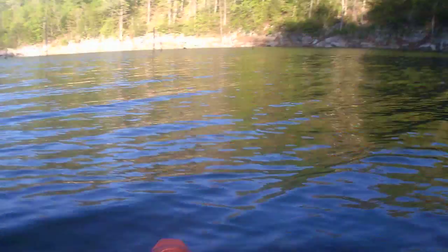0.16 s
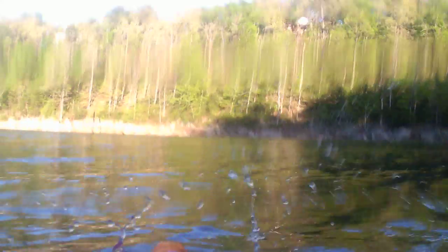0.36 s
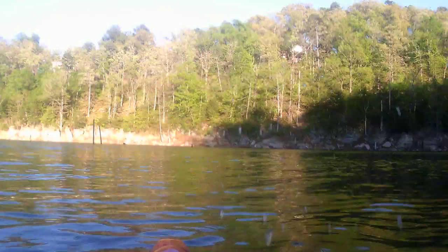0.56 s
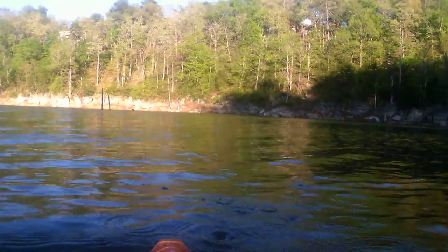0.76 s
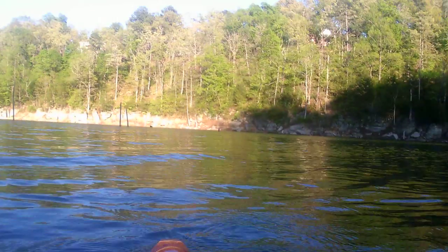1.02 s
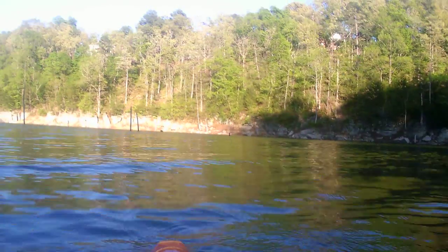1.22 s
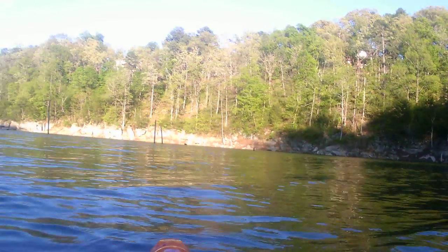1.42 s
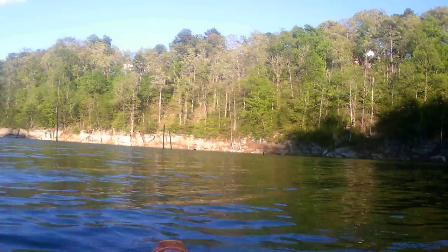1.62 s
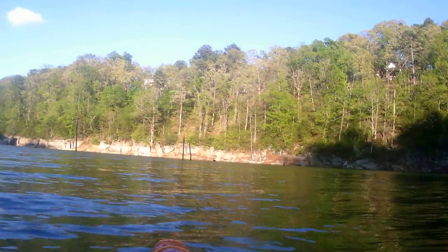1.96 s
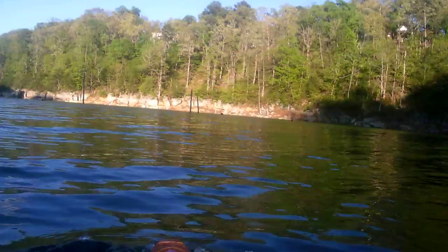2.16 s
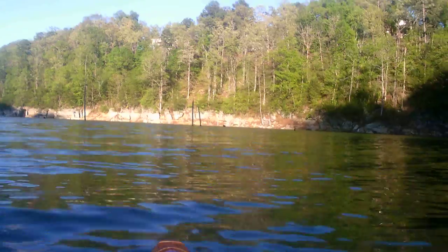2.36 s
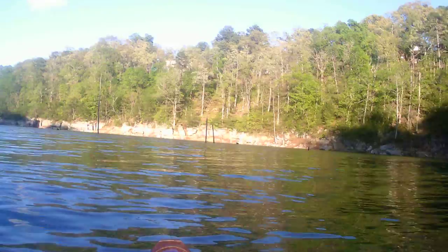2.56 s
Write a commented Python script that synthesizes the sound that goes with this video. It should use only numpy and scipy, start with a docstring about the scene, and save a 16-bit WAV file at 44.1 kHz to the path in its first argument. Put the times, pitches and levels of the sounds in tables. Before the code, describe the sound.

A model boat motor revs in four short churning bursts after the hull slaps the water.

```python
"""A model boat's motor, blipped four times: the propeller churns the lake, the hull hums and shakes.
Before the blips the hull slaps down on the water and a camera mount on deck wobbles.
Spray patters, light drops ping the hull and water washes along it. Churn, slaps, spray and wash ring the
hull's resonances; the camera housing muffles the sound and the loud parts overload the microphone."""
import sys
import numpy as np
from scipy import signal
from scipy.fft import rfft, irfft
from scipy.io import wavfile

SR = 44100
rng = np.random.default_rng(int(sys.argv[2]) if len(sys.argv) > 2 else 0)


def digitize_waveform(pressure):
    """Quantize a signal to 16-bit integers and store it at the path in sys.argv[1].

    Rows of a 2-D input are taken as channels; values are limited to [-1, 1].
    """
    field = np.atleast_2d(pressure).T
    bounded = np.clip(field, -1, 1)
    quanta = np.round(bounded * 32767).astype(np.int16)
    wavfile.write(sys.argv[1], SR, quanta)


N = 119070
TIME_S = np.arange(N) / SR

# throttle blips (start [s], length [s], churn [dB], first bite [0-1], hum [dB], hum onset [Hz], shake [dB])
BLIPS = [(1.085, 0.14, -0.5, 0.31, -6, 154.3, 0), (1.477, 0.15, -1.5, 0.37, -3.5, 185.7, -2.5),
         (2.221, 0.14, -3.5, 0.52, 2.5, 173.4, -1.5), (2.656, .14, 4.5, 0.26, -1, 148.8, 5)]
# water slapping the hull (time [s], level [dB], fade [dB/s])
SLAPS = [(0.085, -30, 211), (0.094, 5, 1493.5), (0.101, -27, 212), (0.226, -0.5, 599), (0.233, -2, 898),
         (.245, 17.5, 998), (0.264, 2, 447.5), (0.299, -2.5, 905), (0.309, 1.5, 302.5), (0.344, -11, 505.5),
         (0.392, -9.5, 250)]
# dull hull bumps (time [s], level [dB], fade [dB/s])
BUMPS = [(0.096, -8.5, 214.5), (0.144, -9.5, 326), (0.225, -5.5, 120.5), (0.307, 7, 233.5),
         (1.713, -0.5, 173), (2.101, -23, 193.5), (2.421, -8.5, 166), (2.58, -12.5, 156.5)]
# blows ringing a hull panel (time [s], level [dB], pitch [Hz], fade [dB/s])
KNOCKS = [(0.096, 4, 1581, 1703.5), (0.148, -1, 142.5, 525.5), (0.247, 15.5, 56.3, 138),
          (.309, 2.5, 396.6, 498.5)]
# camera mount swings (time [s], level [dB])
SWINGS = [(0.241, 7.5)]
# spray hitting the deck (time [s], level [dB])
DROPS = [(0.463, -44), (0.547, -22.5), (.561, -24.5), (0.581, -32), (0.625, -32.5), (0.663, -28.5),
         (0.72, -25), (.738, -31), (.778, -40), (2.064, -25.5), (2.099, -17), (2.104, -39.5), (2.126, -24),
         (2.137, -27), (2.19, -35.5), (2.58, -11), (2.61, -16)]
# light drops pinging the hull (time [s], level [dB], pitch [Hz])
PINGS = [(.463, -23, 972), (0.546, -39, 2480), (0.579, -17.5, 1660), (0.631, -41, 2640), (0.658, -19, 1590),
         (.775, -20, 1656), (0.72, -21.5, 1763), (0.875, -31.5, 1700), (0.93, -32, 1670),
         (0.952, -24.5, 1620), (0.966, -21, 1637), (1.036, -35, 1660), (1.921, -21, 1547),
         (1.929, -22, 1720), (1.986, -27, 1730), (2, -17, 1650), (2, -36, 2270), (2.065, -13, 1530),
         (2.136, -25.5, 2780), (2.579, -31, 1654)]
# wash along the hull (time [s], level [dB])
WASH_LEVELS = [(0, -53.5), (.07, -44), (.2, -35), (.45, -32.5), (.62, -31), (.85, -43), (1.05, -52),
               (1.95, -45.5), (2.15, -44), (2.7, -73)]
# hull resonances (frequency [Hz], width [Hz], height over broad response [dB])
HULL_MODES = [(164.6, 36, 2), (196.8, 30, 7.5), (287.1, 18.6, 9.5), (345.7, 22, 5), (660, 58, 7),
              (950, 146, 6), (1124, 37, 5.5), (1518, 242, 11), (1633, 136, 15), (1770, 150, 10),
              (2530, 200, 7), (2702, 140, 10.5), (3526, 420, 5.5), (3850, 460, 5.5), (5870, 770, 4.5)]
# force spectra on the hull (frequency [Hz], relative level [dB])
WASH_DRIVE = [(20, -9), (90, 11.5), (200, -6.5), (500, -8), (1000, -9), (1700, -16), (2300, -22),
              (3200, -33), (4500, -53.5), (8000, -51), (16000, -65.5)]
DROP_DRIVE = [(60, -5.5), (200, -13), (500, -5), (1000, -3), (1600, -4), (2200, -6), (3000, -22),
              (4000, -29), (4800, -38.5), (7000, -41), (9000, -48.5), (16000, -82)]
SLAP_DRIVE = [(40, 13.5), (200, 9.5), (600, 1), (1100, -2), (1600, -2.5), (2200, -11.5), (3000, -36.5),
              (4500, -56.5), (8000, -58), (16000, -78)]
BUMP_DRIVE = [(20, -14.5), (60, 19.5), (130, 2.5), (220, -7.5), (330, -7.5), (600, -15.5), (1500, -39),
              (4000, -74)]
SLOSH_DRIVE = [(20, -13.5), (50, -2), (85, 14.5), (150, 1), (220, -9), (330, -21.5), (600, -41.5),
               (1500, -44.5), (4000, -88)]
CHURN_DRIVE = [(20, -7), (50, 5), (90, -0.5), (150, -3), (260, -7.5), (480, -16), (1000, -14), (1700, -24),
               (2200, -27), (3000, -39.5), (4500, -53), (8000, -76), (16000, -121.5)]
# steady hiss spectrum (frequency [Hz], gain [dB])
HISS_SPECTRUM = [(5100, -87.5), (7300, -73), (8300, -79.5), (9000, -102)]
# camera housing transmission (frequency [Hz], gain [dB])
HOUSING_RESPONSE = [(4000, -1), (5150, -11), (5800, -1), (8200, -5), (9200, -33)]
# shelf dulling the sound above 8 kHz (frequency [Hz], relative gain [dB])
TREBLE_SHELF = [(3000, -3.5), (7500, -2.5), (9500, -12.5), (15000, -12)]

COAST_DB_PER_S = 115.5


def amp(db):
    """Decibels to gain."""
    return 10 ** (np.asarray(db) / 20)


def unit(x):
    """Scale to rms 1."""
    return x / np.sqrt(np.mean(x ** 2) + 1e-20)


def db_at(spectrum, hz):
    """Interpolate a spectrum on a log-frequency axis."""
    points_hz, points_db = np.transpose(spectrum)
    return np.interp(np.log(hz + 1), np.log(points_hz + 1), points_db)


def wander(bandwidth_hz):
    """Slow random drift, rms 1."""
    hz = np.fft.rfftfreq(N, 1 / SR)
    return unit(irfft(rfft(rng.standard_normal(N)) * np.exp(-(hz / bandwidth_hz) ** 2), N))


def impulses(per_s):
    """Clicks of random time and size."""
    return rng.standard_normal(N) * (rng.random(N) < per_s / SR)


def since(start_s):
    """Seconds since start_s, zero before."""
    return np.maximum(TIME_S - start_s, 0)


def phase_rad(hz):
    """Running phase of a varying frequency."""
    return 2 * np.pi * np.cumsum(hz) / SR


def impact(start_s, db, fade_db_per_s, rise_s):
    """Impact envelope: linear rise, exponential fade."""
    t = since(start_s)
    return np.minimum(t / rise_s, 1) * amp(db - fade_db_per_s * t)


def throttle(start_s, length_s, rise_s, fade_db_per_s, bite=0, bite_s=0.0027):
    """Blip envelope: quick bite, build-up, coast-down."""
    t = since(start_s)
    build = bite + (1 - bite) * np.minimum(t / rise_s, 1)
    return np.minimum(t / bite_s, 1) * build * amp(-fade_db_per_s * since(start_s + length_s))


def colour(x, curve_db, size=16384):
    """Minimum-phase filter with gain curve_db(hz)."""
    hz = abs(np.fft.fftfreq(size, 1 / SR))
    log_gain = np.log(amp(curve_db(hz)))
    response = np.exp(np.conj(signal.hilbert(log_gain)))
    taps = np.fft.ifft(response).real[:size // 2]
    return signal.fftconvolve(x, taps)[:N]


def hull(force, drive):
    """Shape a force by its drive spectrum and the hull modes; white noise keeps its power."""
    def curve_db(hz):
        modes = sum(amp(db) ** 2 / (1 + (2 * (hz - mode_hz) / width_hz) ** 2) ** 2.32
                    for mode_hz, width_hz, db in HULL_MODES)
        power = amp(db_at(drive, hz)) ** 2 * (1 + modes)
        return 10 * np.log10(power / power.mean())
    return colour(force, curve_db)


def hiss():
    """Faint steady treble noise."""
    return colour(rng.standard_normal(N), lambda hz: db_at(HISS_SPECTRUM, hz))


def wash(gurgle_db=4.7):
    """Water gurgles unevenly along the gliding hull."""
    level = amp(np.interp(TIME_S, *np.transpose(WASH_LEVELS)))
    gurgle = unit(rng.standard_normal(N) * amp(gurgle_db * wander(41)))
    return hull(level * gurgle, WASH_DRIVE)


def pings(fade_db_per_s=1098.5, rise_s=0.006):
    """Light drops ping the hull with short, unsteady pitched rings."""
    waver = 1 + 0.045 * wander(196.3)
    return sum(impact(start_s, db, fade_db_per_s, rise_s) * np.sin(phase_rad(hz * waver))
               for start_s, db, hz in PINGS)


def spray(tick_db=13):
    """Each drop rings the deck with a tick and a short scatter."""
    scatter = sum(impact(*drop, fade_db_per_s=893, rise_s=0.0018) for drop in DROPS)
    force = scatter * rng.standard_normal(N)
    for start_s, db in DROPS:
        force[round(start_s * SR)] += amp(db + tick_db)
    return hull(force, DROP_DRIVE)


def mount(rocking_hz=33.6, rocking_db=-25.5, swing_hz=34.8, sag_hz=5, settle_s=0.2):
    """The camera mount rocks constantly and swings after a jolt, slower while the swing is wide."""
    out = amp(rocking_db) * np.sin(phase_rad(rocking_hz * (1 + 0.059 * wander(5.1))))
    for start_s, db in SWINGS:
        hz = (TIME_S > start_s) * (swing_hz - sag_hz * np.exp(-since(start_s) / settle_s))
        out += impact(start_s, db, fade_db_per_s=51.5, rise_s=0.018) * np.sin(phase_rad(hz))
    return out


def landing():
    """The hull smacks the water and booms; its panels ring under the hardest blows."""
    slaps = sum(impact(*slap, rise_s=0.0012) for slap in SLAPS) * rng.standard_normal(N)
    bumps = sum(impact(*bump, rise_s=0.005) for bump in BUMPS) * rng.standard_normal(N)
    knocks = sum(impact(start_s, db, fade_db_per_s, rise_s=0.0007) * np.sin(2 * np.pi * hz * since(start_s))
                 for start_s, db, hz, fade_db_per_s in KNOCKS)
    return hull(slaps, SLAP_DRIVE) + hull(bumps, BUMP_DRIVE) + knocks


def slosh(level_db=-14):
    """Stirred water sloshes on after each blip."""
    stirred = sum(throttle(start_s, length_s, rise_s=0.26, fade_db_per_s=76)
                  for start_s, length_s, *_ in BLIPS)
    return amp(level_db) * hull(stirred * rng.standard_normal(N), SLOSH_DRIVE)


def gulps(per_s=140, low_hz=279, high_hz=1673, pitches=24, decay_cycles=6.7):
    """Large air bubbles, each ringing briefly at its own pitch."""
    t, out = np.arange(6000) / SR, np.zeros(N)
    for hz in np.geomspace(low_hz, high_hz, pitches):
        cycles = hz * t
        ring = (1 - np.exp(-cycles)) * np.exp(-cycles / decay_cycles) * np.sin(2 * np.pi * cycles)
        out += signal.oaconvolve(impulses(per_s / pitches), ring)[:N]
    return unit(out)


def propeller(spin_up_s=0.082, bubble_share=0.44, lumps_db=1.5, gulp_db=-10):
    """Lumpy churn and bubbles beat on the hull while the propeller spins."""
    effort = sum(amp(db) * throttle(start_s, length_s, spin_up_s, COAST_DB_PER_S, bite)
                 for start_s, length_s, db, bite, *_ in BLIPS)
    bubbles = unit(impulses(per_s=1500))
    froth = bubble_share * bubbles + (1 - bubble_share) * rng.standard_normal(N)
    churn = unit(froth * amp(lumps_db * wander(250)))
    return hull(effort * churn, CHURN_DRIVE) + amp(gulp_db) * effort * gulps()


def motor(loaded_hz=144.94, sag_s=0.0417, rough_db=2.5, octave_db=-12.5, shake_hz=50, freed_hz_per_s=30):
    """Each blip starts a rough hum that sags under load and a low shake that quickens on release."""
    out = np.zeros(N)
    for start_s, length_s, _, _, hum_db, onset_hz, shake_db in BLIPS:
        started, coast_s = TIME_S > start_s, since(start_s + length_s)
        hum_hz = loaded_hz + (onset_hz - loaded_hz) * np.exp(-since(start_s) / sag_s)
        hum_rad = phase_rad(started * hum_hz * (1 + 0.027 * wander(85)))
        hum_level = impact(start_s, hum_db, fade_db_per_s=71, rise_s=0.0064)
        hum_level *= amp(rough_db * wander(99) - COAST_DB_PER_S * coast_s)
        out += hum_level * (np.sin(hum_rad) + amp(octave_db) * np.sin(2 * hum_rad))

        rate_hz = (shake_hz + freed_hz_per_s * coast_s) * (1 + 0.022 * wander(17.6))
        shake_level = amp(shake_db) * throttle(start_s, length_s, rise_s=0.081, fade_db_per_s=67)
        out += shake_level * np.sin(phase_rad(started * rate_hz))
    return out


def scene():
    """Boat and water through the camera housing, over hiss; mono."""
    outside = wash() + pings() + spray() + mount() + landing() + slosh() + propeller() + motor()
    inside = colour(outside, lambda hz: db_at(HOUSING_RESPONSE, hz))
    return (hiss() + inside)[None]


def record(dry, ceiling=0.705, cutoff_hz=15900):
    """The input clips hard (2x oversampled); then a treble shelf and a low-pass dull the sound."""
    oversampled = signal.resample_poly(dry[0], 2, 1)
    clipped = signal.resample_poly(np.clip(oversampled, -ceiling, ceiling), 1, 2)
    hz = np.linspace(0, SR / 2, 129)
    shelf_db = db_at(TREBLE_SHELF, hz) - TREBLE_SHELF[0][1]
    shelved = signal.fftconvolve(clipped, signal.firwin2(127, hz, amp(shelf_db), fs=SR), "same")
    lowpass = signal.firwin(511, cutoff_hz, window=("kaiser", 9), fs=SR)
    return signal.fftconvolve(shelved, lowpass, "same")[None]


dry = scene()
out = record(dry)
digitize_waveform(out)
```